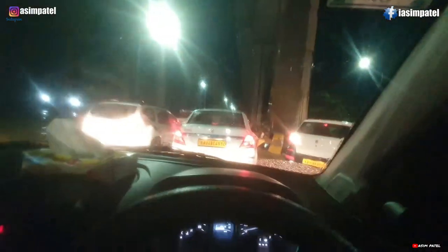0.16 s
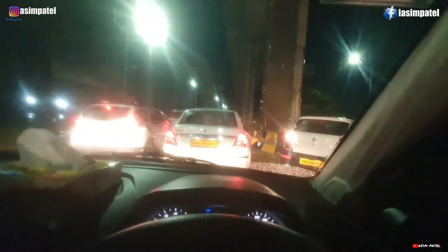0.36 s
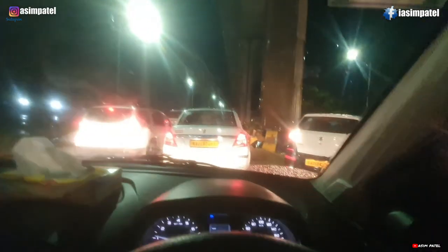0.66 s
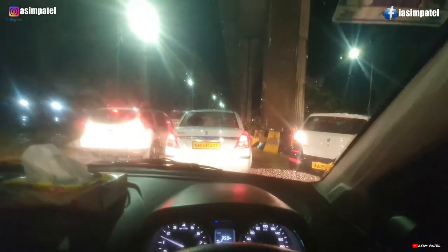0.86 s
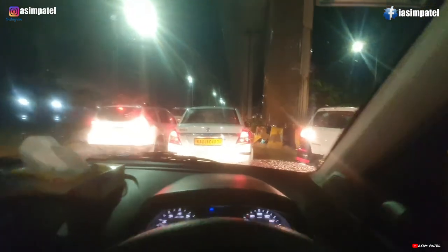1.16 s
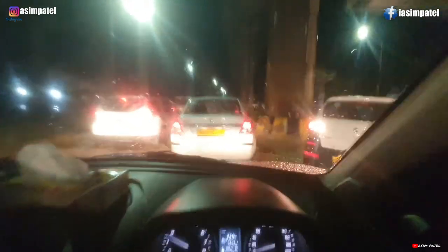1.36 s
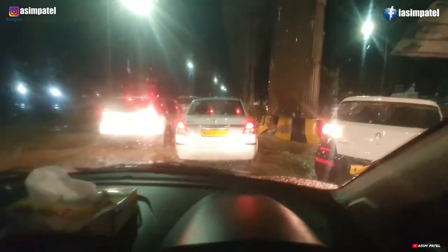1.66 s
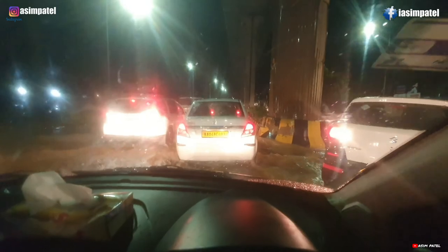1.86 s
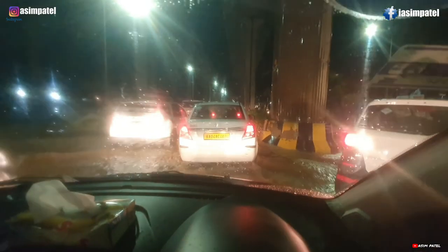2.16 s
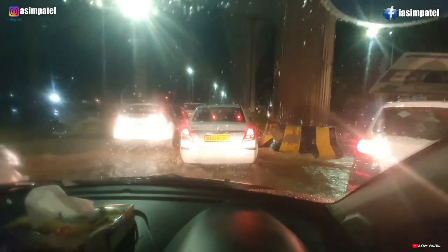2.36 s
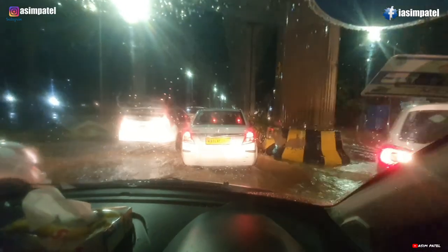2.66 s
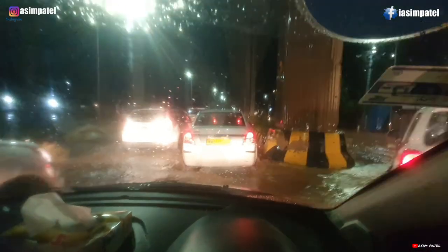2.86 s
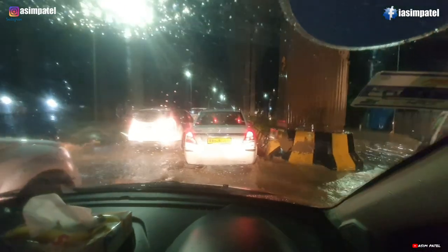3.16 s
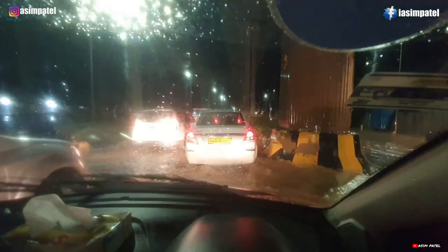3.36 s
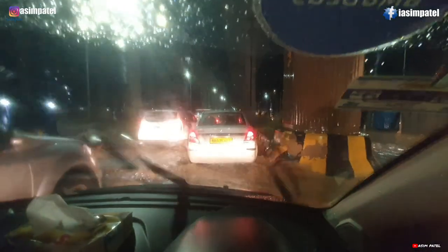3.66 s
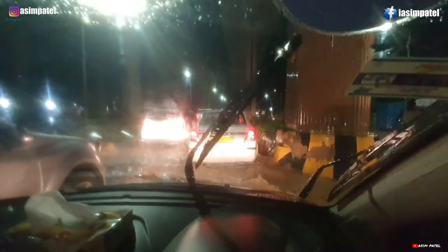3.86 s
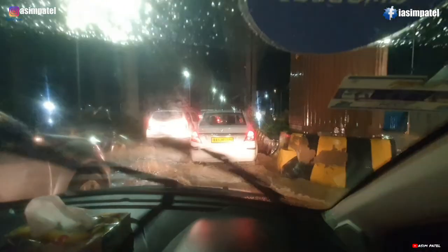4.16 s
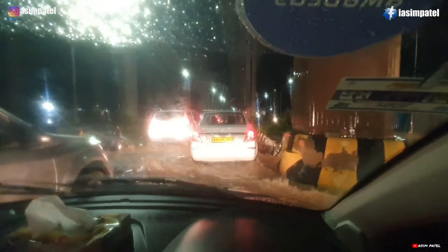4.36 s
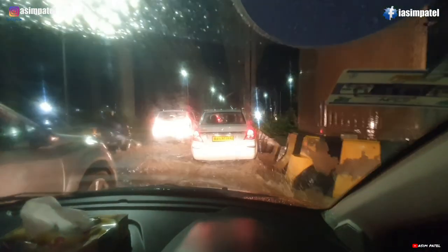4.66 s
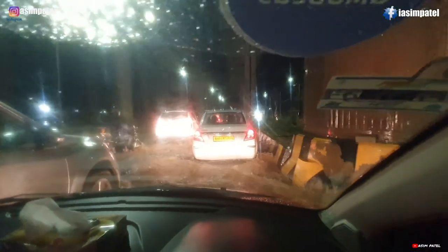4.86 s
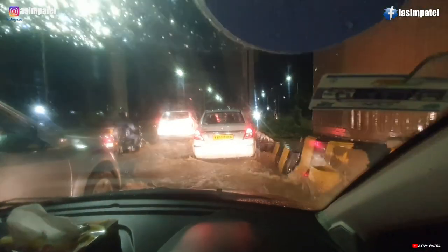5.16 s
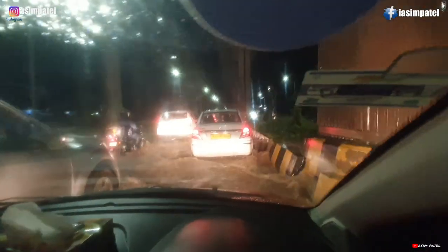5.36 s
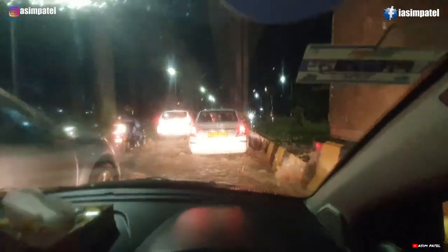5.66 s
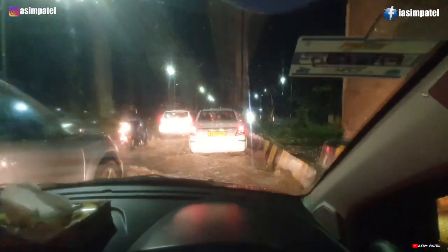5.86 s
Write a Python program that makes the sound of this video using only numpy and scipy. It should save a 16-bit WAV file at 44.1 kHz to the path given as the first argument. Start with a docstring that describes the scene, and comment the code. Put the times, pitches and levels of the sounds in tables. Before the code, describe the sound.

From the driver's seat with the windows closed, a car's engine and road rumble drone steadily as water washes around the tyres on a flooded street. A faint horn toots far ahead. Past the middle, the wiper sticks and slips on the windscreen in two short rubbery knocks, the second louder. Near the end, the plastic horn pad clacks and a two-note horn blares close by.

```python
"""A car's engine and road rumble, from the driver's seat, creeping along a flooded street at night.
Stereo microphones, windows closed: the firing booms in the cabin, water washes round the tyres outside.
At arm's length the wiper makes one sweep, its blade sticking and slipping on the glass in two knocks.
A horn toots far up the road; near the end the horn pad clacks and two horn diaphragms blare close by.
Small ticks, whistles, squeaks and brief swells of thin, high hiss lie faintly behind."""
import sys
import numpy as np
from scipy import signal
from scipy.fft import rfft, irfft, next_fast_len
from scipy.io import wavfile
from scipy.ndimage import uniform_filter1d, map_coordinates

SR = 44100
rng = np.random.default_rng(int(sys.argv[2]) if len(sys.argv) > 2 else 0)


def master_out(mix):
    """Clip the mix to full scale and print it as 16-bit PCM to the path in sys.argv[1]."""
    frames = np.transpose(np.atleast_2d(mix))
    ceiling = np.clip(frames, -1, 1)
    pcm = np.round(ceiling * 32767).astype(np.int16)
    wavfile.write(sys.argv[1], SR, pcm)


N = 265041
TIME = np.arange(N) / SR


# touches of the throttle: t/s, length/s, rise the firing rate heads for/Hz
THROTTLE_TOUCHES = [(0.269, 0.71, 20.4), (2.451, 1.15, 22), (4.901, .5, 20)]
# overtones of the firing rate, droning in the cabin: multiple, level/dB
ENGINE_DRONE = [(2, -46), (3, -49.5), (4, -53), (5, -54)]

def engine():
    """Just ahead of the seat: the firing rate climbs with the throttle and sinks back to idle."""
    idle_hz, boom_hz, rev_up_s, rev_down_s = 24.57, 28, .38, .42
    firing_hz = idle_hz
    for s, length, rise_hz in THROTTLE_TOUCHES:
        climb = 1 - np.exp(-np.clip(TIME - s, 0, length) / rev_up_s)
        sink = np.exp(-np.maximum(TIME - s - length, 0) / rev_down_s)
        firing_hz += rise_hz * climb * sink
    boom_db = -40 - 33 * np.log2(firing_hz / boom_hz) ** 2  # the cabin booms most at one firing rate
    phase = wavering_phase(firing_hz, depth=0.02, rate=12)
    boom = amp(boom_db) * np.sin(phase)
    drone = sum(amp(db + 4.1 * wobble(6)) * np.sin(k * phase + 2 * np.pi * rng.random())
                for k, db in ENGINE_DRONE)
    return np.sqrt(2) * (boom + drone)


# the road at the driver's seat: t/s, rumble level/dB, wash level/dB
ROAD_LEVELS = [(0, -35, -48.5), (1.5, -37.5, -48.5), (2.6, -35.5, -48), (3.9, -33.5, -45),
               (4.2, -34.5, -47), (5.3, -34, -45), (6.01, -35, -46)]
# spectra of the body's rumble and the tyres' wash: f/Hz, relative level/dB
RUMBLE_SPECTRUM = [(18, -28), (26, -4.5), (40, 3), (52, -1.5), (80, -4.5), (125, -5), (190, -4),
                   (215, -9.5), (260, -16), (400, -23.5), (700, -38.5), (1500, -86)]
WASH_SPECTRUM = [(100, -39), (300, 4), (500, 2), (720, -3), (950, -2.5), (1200, -8), (2500, -11.5),
                 (3500, -19.5), (5000, -30.5), (6600, -35.5), (8000, -53)]
# the wash across the two microphones: f/Hz, left-right likeness
WASH_LIKENESS = [(250, -0.9), (500, 0.025), (1000, -0.72), (2000, -0.33), (3500, -0.031)]

def road():
    """Rumble comes up through the body, the wash of tyres in water through the windows."""
    rumble_db, wash_db = curves(ROAD_LEVELS)
    rumble = amp(rumble_db) * noise(RUMBLE_SPECTRUM, [(100, 0.97)])
    wash = amp(wash_db + 0.37 * wobble(10)) * noise(WASH_SPECTRUM, WASH_LIKENESS, patchy_db=2.13)
    return rumble * pan(0.88) + wash * pan(4.2)


# judders of the wiper blade, levels relative: t/s, length/s, hardest t/s, rasp level/dB,
# thump level/dB, thump f/Hz, scrape level/dB, top of the rasp f/Hz
BLADE_JUDDERS = [(3.293, .024, 3.302, -25.5, -31, 122, -51.5, 1330),
                 (3.317, .024, 3.319, -44, -30.5, 332, -55.5, 1250),
                 (3.745, .012, 3.747, -21, -20.5, 229.3, -49, 1850),
                 (3.761, .012, 3.761, -23.5, -25, 251, -54, 1730),
                 (3.779, .012, 3.783, -16, -34, 264, -46.5, 1750),
                 (3.793, .012, 3.793, -17.5, -22, 242, -42.5, 1910),
                 (3.807, .036, 3.812, -22, -27.5, 330, -39.5, 2300),
                 (3.952, .012, 3.948, -44, -32, 431, -68.5, 980)]

def blade_slips():
    """Rubber sticks and slips on the glass: each judder is a quick, uneven run of slips."""
    slip_s, scatter_s, scatter_db = .0132, .0012, 1.5
    scrape_lag_s = 0.022  # the thin scrape peaks after the rasp
    ease_db = lambda away_s: 15 * (away_s / 0.062) ** 2  # slips weaken away from the hardest
    for start, length, hardest, rasp_db, thump_db, hz, scrape_db, top_hz in BLADE_JUDDERS:
        for age in np.arange(0, length, slip_s):
            late, harder_db = rng.standard_normal(2) * [scatter_s, scatter_db]
            s = start + age + late
            force_db = harder_db - ease_db(s - hardest)
            yield (s, rasp_db + force_db,
                   thump_db - 98 * age, hz * 2 ** (5.4 * age),  # the thumps weaken and rise in pitch
                   scrape_db + harder_db - ease_db(s - hardest - scrape_lag_s),
                   top_hz * 2 ** (force_db / 24))  # the harder, the brighter


# partials of a thump in the windscreen: multiple, relative level/dB, t60/s
SCREEN_MODES = [(0.998, 0.5, 0.069), (1.298, -6.5, 0.067), (2.5, -24, 0.059)]
# the blade drags on wet glass around its judders: start t/s, end t/s, level/dB
BLADE_DRAGS = [(3.28, 3.342, -44.5), (3.625, 3.728, -43.5), (3.754, 3.778, -27), (3.95, 4.025, -42)]
# spectra of the rubber's rasp, thin scrape and dull drag: f/Hz, relative level/dB
RASP_SPECTRUM = [(150, -18), (300, 6), (480, 0.5), (620, 6), (690, -0.5), (930, 4.5), (1050, -9), (1220, 8),
                 (1350, -8.5), (1460, 1), (1800, -2.5), (2300, -10.5), (4000, -19.5)]
SCRAPE_SPECTRUM = [(800, -11.5), (2000, 7), (3500, 6.5), (4500, -6), (6500, -12), (8000, -26), (12000, -22)]
DRAG_SPECTRUM = [(130, -26), (220, 6), (380, 5), (600, -8), (1500, -18.5), (3000, -42), (7000, -90.5)]

def wiper():
    """At arm's length the blade drags; each slip thumps the screen and leaves a short rasp of rubber."""
    thump, scrape_power, rasp = np.zeros(N), np.zeros(N), np.zeros((2, N))
    t = np.arange(SR // 2) / SR
    rubber = noise(RASP_SPECTRUM, [(300, 0.12), (700, -0.19)])
    for s, rasp_db, thump_db, hz, scrape_db, top_hz in blade_slips():
        # soft rubber: the screen swings up over a few milliseconds
        ring = sum(amp(db) * fade(t60, rise=0.0047) * np.sin(2 * np.pi * (ratio * hz * t + rng.random()))
                   for ratio, db, t60 in SCREEN_MODES)
        add(thump, s, amp(thump_db + 8.5) * ring)
        grit = np.roll(rubber, rng.integers(N), axis=1)[:, :len(t)]
        lowpass = signal.butter(7, np.clip(top_hz, 300, 4000), fs=SR, output="sos")
        add(rasp, s, amp(rasp_db + 9.5) * fade(t60=0.076, rise=0.0078) * signal.sosfilt(lowpass, grit))
        add(scrape_power, s, (amp(scrape_db + 8) * fade(t60=0.078, rise=0.004)) ** 2)
    scrape = np.sqrt(scrape_power) * noise(SCRAPE_SPECTRUM, [(3000, 0.1)])
    drag_gain = sum(amp(db) * held(start, end, 500, 500) for start, end, db in BLADE_DRAGS)
    drag = drag_gain * noise(DRAG_SPECTRUM, [(300, 0.75)])
    return thump + drag + rasp * pan(2.7) + scrape * pan(1.9)


# the close horn at the two microphones: f/Hz, lag of the left/rad
MICROPHONE_LAG = [(340, .65), (900, 1.2), (1700, 2.5), (3100, 2.5), (6000, 1.2)]

def horn_note(hz, partials, swell_db):
    """A buzzing diaphragm barks as it builds up; street reflections make its upper partials flutter."""
    start_s, rise_s, bloom_s_per_khz = 5.546, 0.016, 0.0071
    bark_db, bark_hz, bark_oct, bark_s = 8.5, 2480, .3, 0.089
    live = TIME > start_s
    t = TIME[live] - start_s
    phase = wavering_phase(hz, depth=.004, rate=170)[live]
    note = np.zeros((2, N))
    for k, *levels in partials:
        partial_hz = k * hz
        flutter = .5 * min(partial_hz / 3000, 1) ** 2
        buzz = 1 + .055 * np.sqrt(k) * wobble(260, t)  # the rattle roughens high partials most
        bark = amp(bark_db * np.exp(-(np.log2(partial_hz / bark_hz) / bark_oct) ** 2 - (t / bark_s) ** 4))
        bloom = np.minimum(t / (bloom_s_per_khz * partial_hz / 1000), 1) ** 2  # high ones build up later
        for side, db in enumerate(levels):
            reflections = flutter * (wobble(42, t) + 1j * wobble(42, t))
            paths = (1 + reflections) / np.sqrt(1 + 2 * flutter ** 2)
            wave = np.exp(1j * (k * phase + side * along(MICROPHONE_LAG, partial_hz)))
            gain = np.sqrt(2) * amp(db + (k == 1) * swell_db[live])
            note[side, live] += gain * bloom * bark * buzz * (paths * wave).imag
    return np.clip((TIME - start_s) / rise_s, 0, 1) * note


# partials of the two notes, before swell and bark: multiple, left level/dB, right level/dB
LOW_PARTIALS = [(1, -30.5, -19), (2, -51, -64.5), (3, -52, -62), (4, -64.5, -54.5), (5, -43, -43),
                (6, -77.5, -54.5), (7, -56, -73.5), (8, -54.5, -45.5), (9, -38, -35), (10, -48.5, -39.5),
                (11, -59.5, -50.5), (15, -75.5, -68), (17, -73, -77.5)]
HIGH_PARTIALS = [(1, -37, -34.5), (2, -54.5, -59), (3, -62.5, -66), (4, -47, -44.5), (5, -59, -59.5),
                 (7, -57, -50.5), (8, -46.5, -56), (10, -69, -68), (11, -79.5, -75), (14, -79, -79),
                 (15, -75, -83.5), (20, -82.5, -90.5)]
# swell of their fundamentals: t/s, low note gain/dB, high note gain/dB
HORN_SWELL = [(5.56, -1.5, 11.5), (5.61, 3.5, 9.5), (5.69, -1, 6), (5.77, -1.5, 3.5), (5.85, -2.5, -4.5),
              (5.91, -1.5, -5.5), (6.0, -2, 2)]

def near_horn():
    """Close by, two horn notes blare together, their fundamentals swelling and sinking."""
    low_db, high_db = curves(HORN_SWELL)
    return horn_note(340.2, LOW_PARTIALS, low_db) + horn_note(432.8, HIGH_PARTIALS, high_db)


# the horn pad is touched, then pushed: t/s, length/s, relative level/dB
PAD_PUSHES = [(5.397, 0.0038, -16.5), (5.516, 0.0037, -12.5), (5.531, 0.011, 0)]
# resonances of the pad: f/Hz, width/Hz, relative level/dB
PAD_MODES = [(1012.5, 120, 0), (2074, 92, -1), (4650, 110, -11)]

def horn_pad():
    """Right by the microphones the plastic pad clacks; the wheel rings on faintly after each push."""
    ring = resonances(PAD_MODES)
    click = noise([(400, 3.5), (1200, 5), (5500, 0), (8000, -10.5), (15000, -15)], [(3000, 0.071)])
    pushes = lambda fall: sum(amp(db) * held(s, s + length, 3500, fall) for s, length, db in PAD_PUSHES)
    clack, tail = pushes(fall=1201), amp(-13) * pushes(fall=258.5)
    return np.maximum(clack, tail) * (amp(-33.5) * ring + amp(-34) * click) * pan(2.1)


# far horn partials that get into the car: multiple, start level/dB, end level/dB, echo gain/dB
FAR_PARTIALS = [(6, -69, -72, -15), (7, -53, -59.5, -2.5), (8, -53, -43.5, -16.5)]

def far_horn():
    """Far up the road, thinned by the closed windows, a toot brightens and leaves a street echo."""
    start, end = 1.137, 1.277
    phase = wavering_phase(hz=428.3, depth=0.0032, rate=160)
    direct, echo = held(start, end, 1003, 1003), held(start, end, 1003, 133)
    toot = np.zeros(N)
    for k, first_db, last_db, echo_db in FAR_PARTIALS:
        db, = curves([(start, first_db), (end, last_db)])
        toot += amp(db + 1.1 * wobble(120)) * np.maximum(direct, amp(echo_db) * echo) * np.sin(k * phase)
    rattle = 1 + 0.2 * wobble(700)  # of the diaphragm
    return np.sqrt(2) * toot * rattle * pan(10.3)


# air in narrow gaps: f/Hz, width/Hz, middle of the change t/s, level before/dB, level after/dB
GAP_WHISTLES = [(876, 76, 2.15, -68.5, -57), (986, 44, 2, -66.5, -62), (1551, 140, 2.2, -62, -85.5)]

def whistles():
    """Air whistles in gaps round the cabin: narrow noise bands that grow or fade as the car moves on."""
    air = np.zeros((2, N))
    for hz, width, s, before_db, after_db in GAP_WHISTLES:
        db, = curves([(s - 1, before_db), (s + 1, after_db)])
        air += amp(db) * resonances([(hz, width, 0)])
    return air


# swishes in the cabin: start t/s, end t/s, level/dB
SWISH_SPANS = [(1.354, 1.393, -59), (3.901, 3.989, -57.5)]
# their spectrum: f/Hz, relative level/dB
SWISH_SPECTRUM = [(1000, -8.5), (3000, 2.5), (4500, 3), (6200, -3), (8000, -19), (11000, -10.5)]

def swishes():
    """Something soft brushes by near the seat, twice."""
    gain = sum(amp(db) * held(start, end, 596, 303) for start, end, db in SWISH_SPANS)
    return gain * noise(SWISH_SPECTRUM, [(3000, .1)]) * pan(1.5)


# ticks in the cabin: t/s, relative level/dB, t60/s
CABIN_TICKS = [(4.262, -63, 0.082), (4.652, -58, 0.022), (4.707, -55.5, 0.024), (5.715, -61.5, .06)]
# their spectrum: f/Hz, relative level/dB
TICK_SPECTRUM = [(200, -4), (1000, 6), (1450, -2), (2020, 8), (2400, 1), (7000, -4), (16000, -20)]

def ticks():
    """Small things tick round the seat, each a dry burst of noise."""
    gain = np.zeros(N)
    for s, db, t60 in CABIN_TICKS:
        add(gain, s, amp(db + 6.5) * fade(t60, rise=0.0017))
    return gain * noise(TICK_SPECTRUM, [(3000, .1)], patchy_db=2.5) * pan(1.5)


# brief swells of thin, high hiss: start t/s, end t/s, relative level/dB
HISS_SPANS = [(0.217, 0.336, -67.5), (1.152, 1.262, -63), (2.12, 2.345, -74), (2.81, 2.87, -73.5),
              (5.128, 5.199, -72.5), (5.438, 5.523, -64.5)]
# their spectrum: f/Hz, relative level/dB
HISS_SPECTRUM = [(1500, -30), (3500, -1), (6000, 0), (8000, -5), (12000, 1.5), (15500, 1)]

def hiss_swells():
    """Brief swells of thin, high hiss, with a fainter hiss between the later ones."""
    slope = 305  # dB/s at both ends
    faint = amp(-83.5 + 4 * wobble(3.61)) * held(2.2, 5.546, slope, slope)
    power = sum((amp(db) * held(start, end, slope, slope)) ** 2 for start, end, db in HISS_SPANS)
    return np.sqrt(faint ** 2 + power) * amp(5) * noise(HISS_SPECTRUM, [(8000, 0.46)]) * pan(3)


# thin squeaks, barely reaching the seat: start t/s, end t/s, f/Hz, level/dB
SQUEAK_TONES = [(0.29, 0.335, 3930, -74), (0.425, 0.496, 4960, -81)]

def squeaks():
    """Faint, unsteady high tones, perhaps of a brake, as the car rolls off."""
    tone = lambda hz: np.sqrt(2) * np.sin(wavering_phase(hz, depth=.006, rate=300))
    return sum(amp(db) * held(start, end, 251, 251) * tone(hz) for start, end, hz, db in SQUEAK_TONES)


def amp(db):
    """Decibels to gain."""
    return 10 ** (np.asarray(db) / 20)


def unit(x):
    """Scaled to rms 1."""
    return x / np.sqrt(np.mean(x ** 2) + 1e-20)


def pan(right_db):
    """Left and right gains, right_db apart."""
    return amp([[-right_db / 2], [right_db / 2]])


def along(points, hz):
    """The value at hz between (f/Hz, value) points on a log axis."""
    f, v = np.transpose(points)
    return np.interp(np.log(hz + 1), np.log(f + 1), v)


def curves(rows):
    """One value per sample for each column after the time."""
    s, *cols = np.transpose(rows)
    return [np.interp(TIME, s, c) for c in cols]


def wobble(rate, t=TIME):
    """A smooth random curve over the times t, rate knots a second."""
    return map_coordinates(rng.standard_normal(int(t[-1] * rate) + 4), [t * rate])


def wavering_phase(hz, depth, rate):
    """Phase of a tone whose pitch wobbles by the fraction depth."""
    return 2 * np.pi * np.cumsum(hz * (1 + depth * wobble(rate))) / SR


def held(start, end, rise_db_per_s, fall_db_per_s):
    """A gain that rises to 1 at start, holds until end and dies away."""
    return amp(-rise_db_per_s * np.maximum(start - TIME, 0) - fall_db_per_s * np.maximum(TIME - end, 0))


def fade(t60, rise):
    """A rise and an exponential decay, half a second long."""
    t = np.arange(SR // 2) / SR
    return amp(-60 * t / t60) * (1 - np.exp(-t / rise))


def add(track, s, sound):
    """Mix a sound into a track at time s."""
    part = track[..., round(s * SR):][..., :sound.shape[-1]]
    part += sound[..., :part.shape[-1]]


def filtered(x, response):
    """x with its spectrum multiplied by response(hz)."""
    m = next_fast_len(N + SR // 2)
    return irfft(rfft(x, m) * response(np.fft.rfftfreq(m, 1 / SR)), m)[..., :N]


def noise(spectrum, likeness, patchy_db=None):
    """Stereo noise of rms 1 with a given left-right likeness and optional patches of random gain."""
    pair = rng.standard_normal((2, N))
    if patchy_db:
        cells = signal.stft(pair, nperseg=512)[2]
        patches = uniform_filter1d(rng.standard_normal(cells.shape[1:]), size=5, axis=0)
        patches = uniform_filter1d(patches, size=14, axis=1)
        pair = signal.istft(cells * amp(patchy_db * unit(patches)), nperseg=512)[1][:, :N]
    turn = lambda hz: np.arccos(np.clip(along(likeness, hz), -1, 1)) / 2
    mid, side = filtered(pair, lambda hz: amp(along(spectrum, hz)) * [np.cos(turn(hz)), np.sin(turn(hz))])
    return unit(np.array([mid + side, mid - side]))


def resonances(peaks):
    """Stereo noise of rms 1 in narrow bands: f/Hz, width/Hz, relative level/dB."""
    response = lambda hz: sum(amp(db) / (1 + ((hz - f) / width * 1.34) ** 2) for f, width, db in peaks)
    return unit(filtered(rng.standard_normal((2, N)), response))


def scene():
    """Everything heard from the driver's seat."""
    driving = engine() + road() + whistles() + squeaks()
    return driving + wiper() + hiss_swells() + ticks() + swishes() + far_horn() + horn_pad() + near_horn()


def record(dry):
    """The phone's microphones, in the cabin, keep nothing above their band limit."""
    return filtered(dry, lambda hz: hz < 15750)


dry = scene()
out = record(dry)
master_out(out)
```